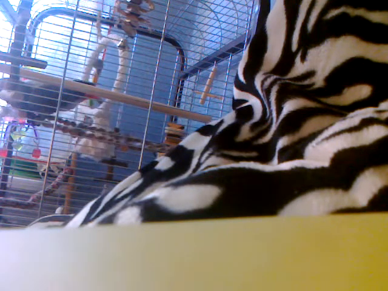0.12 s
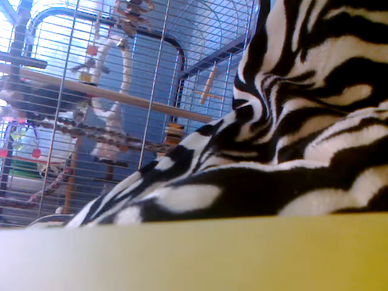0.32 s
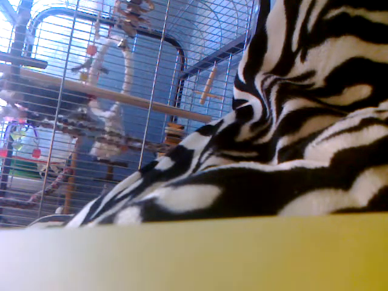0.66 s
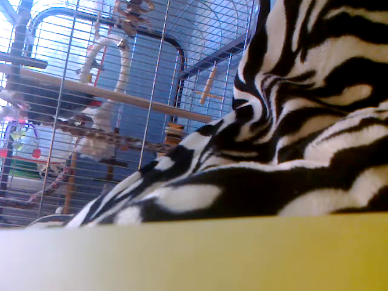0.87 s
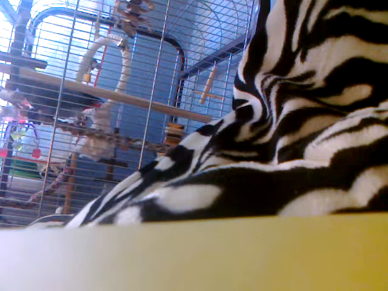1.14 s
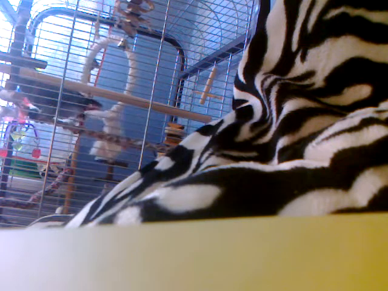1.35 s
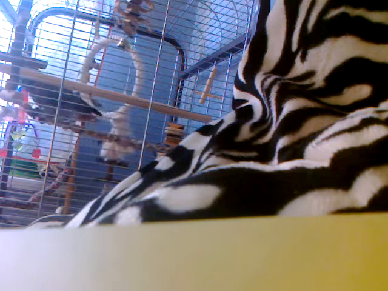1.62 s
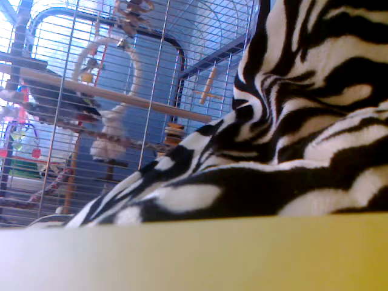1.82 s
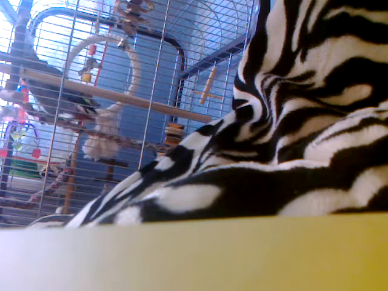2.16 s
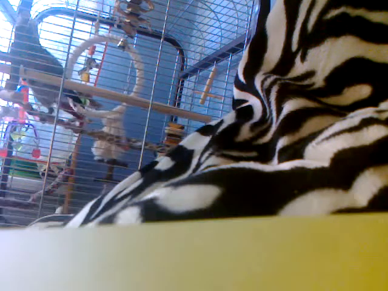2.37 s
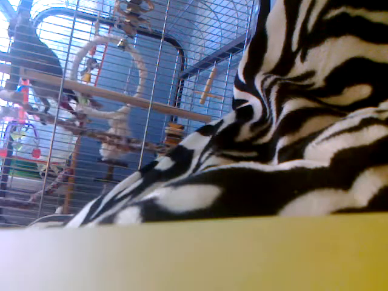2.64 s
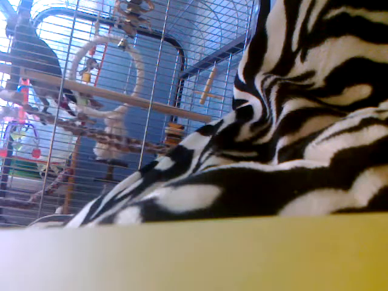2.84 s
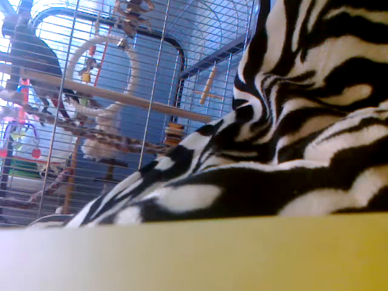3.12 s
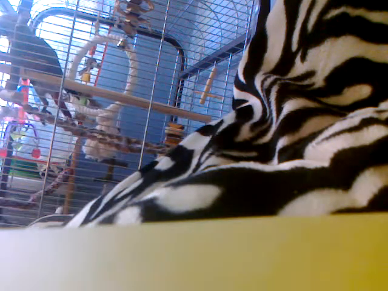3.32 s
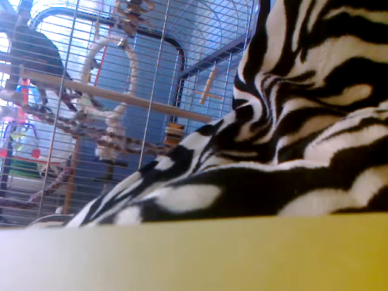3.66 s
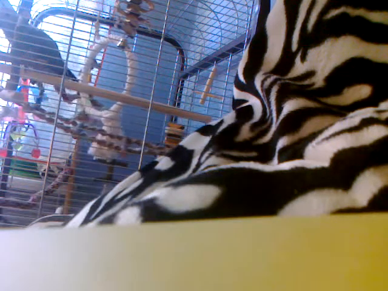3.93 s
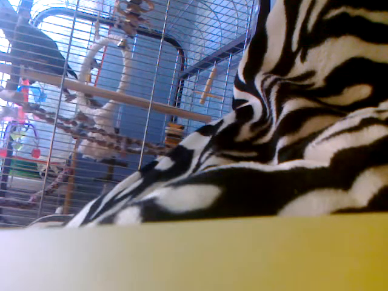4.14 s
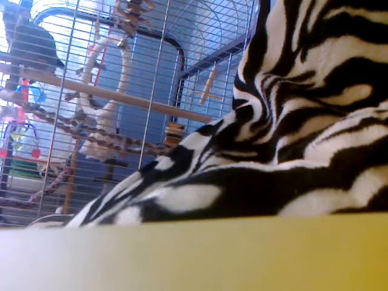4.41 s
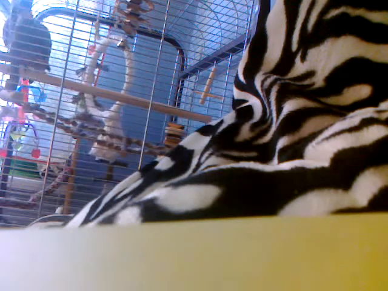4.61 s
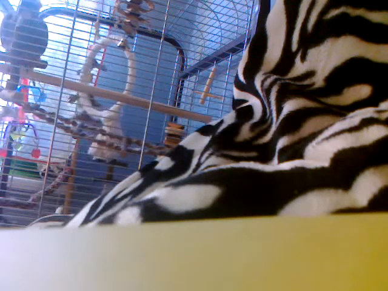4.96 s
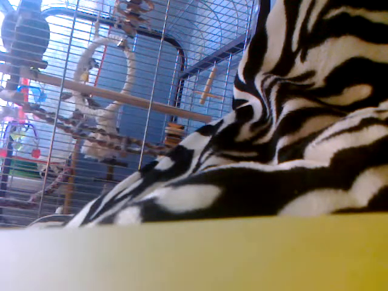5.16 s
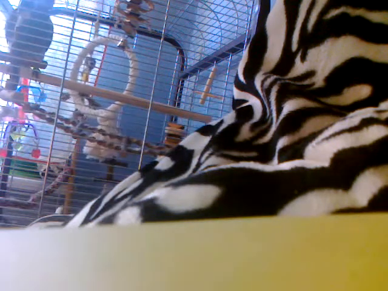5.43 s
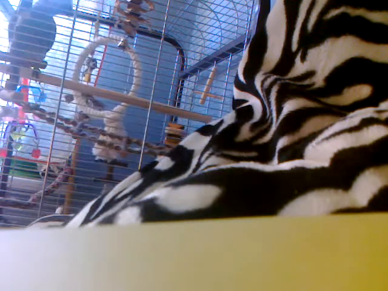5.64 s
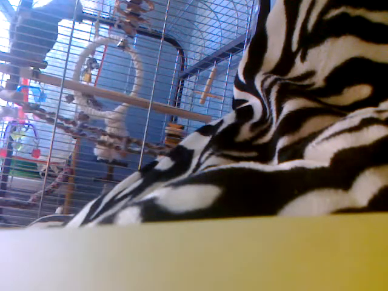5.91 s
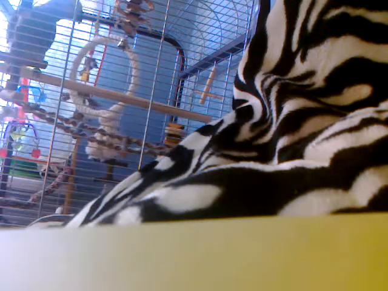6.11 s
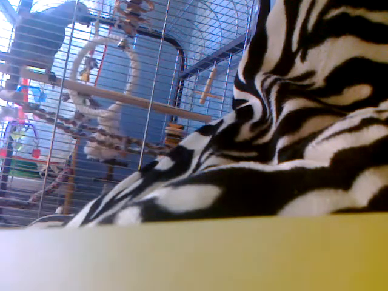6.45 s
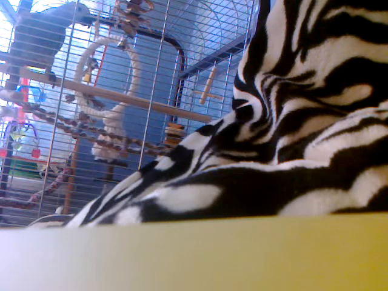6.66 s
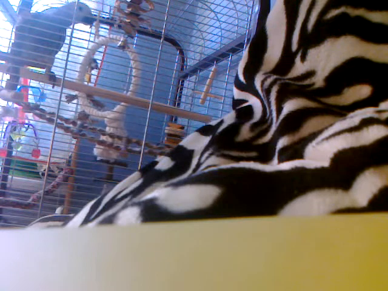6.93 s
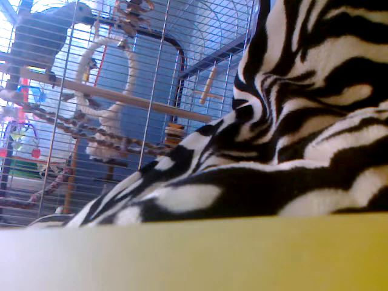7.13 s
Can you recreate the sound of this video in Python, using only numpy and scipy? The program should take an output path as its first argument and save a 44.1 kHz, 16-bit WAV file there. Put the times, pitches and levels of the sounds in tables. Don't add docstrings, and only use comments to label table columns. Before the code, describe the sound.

Faint claw ticks, soft thumps and feather rustles in a humming room, two hollow tongue clucks, then a burst of sharp wooden knocks and quiet ticking.

```python
import sys
import numpy as np
from scipy import signal
from scipy.fft import rfft, irfft, next_fast_len
from scipy.io import wavfile
from scipy.ndimage import map_coordinates

SR = 44100
rng = np.random.default_rng(int(sys.argv[2]) if len(sys.argv) > 2 else 0)


def int16_out(signal):
    q = np.round(np.clip(np.atleast_2d(signal).T, -1, 1) * 32767)
    wavfile.write(sys.argv[1], SR, q.astype(np.int16))


def ratio(d):
    e = np.asarray(d, float) / 20
    return 10 ** e


N = 321003
T = np.arange(N) / SR


def unit(x):
    return x / np.sqrt(np.mean(x ** 2) + 1e-20)


def along(points, hz):
    f, v = np.transpose(points)
    return np.interp(np.log(hz + 1), np.log(f + 1), v)


def wobble(rate):
    knots = rng.standard_normal(int(N * rate / SR) + 4)
    return map_coordinates(knots, [T * rate])


def noise(response):
    m = next_fast_len(N + 8192)
    white = rfft(rng.standard_normal(m))
    return irfft(white * response(np.fft.rfftfreq(m, 1 / SR)), m)[:N]


def colored(curve):
    return unit(noise(lambda f: ratio(along(curve, f))))


def resonances(modes, f):
    total = 0
    for center, width, db in modes:
        once = 1j * f * width / (center * center - f * f + 1j * f * width)
        total = total + ratio(db) * once ** 2
    return total


# f/Hz, t60/s
ROOM_DECAY = [(150, 0.14), (800, 0.41), (2000, 0.34), (5000, 0.31), (12000, 0.53)]


def tail():
    hz, t, z = signal.stft(rng.standard_normal(SR // 2), SR, nperseg=256)
    decay = ratio(-60 * t / along(ROOM_DECAY, hz)[:, None])
    x = signal.istft(z * decay, SR, nperseg=256)[1]
    t = np.arange(len(x)) / SR
    lumps = np.interp(t * 1000, np.arange(600), rng.standard_normal(600))
    x = x * ratio(3.5 * lumps * np.exp(-t / .06))
    x = x * np.clip((t - .0015) / .005, 0, 1)
    return x / np.linalg.norm(x)


def add(out, s, dry, ring, wet_db):
    wet = ratio(wet_db) * signal.fftconvolve(ring, tail())
    wet[:len(dry)] += dry
    out[round(s * SR):][:len(wet)] += wet


# f/Hz, level/dB per Hz
BAR_BUZZ = [(1500, -29), (4000, 5.5), (6500, -0.5), (9000, -4), (15000, -13)]


def contacts(rows, modes, object_db, width_hz, soft_hz, wire_db, wet_db, shade=0.66, flip=1):
    out, f, t = np.zeros(N + SR), np.fft.rfftfreq(2048, 1 / SR), np.arange(2048) / SR
    for (s, db, body_hz, tip_hz, tip_db), room_db in zip(rows, wet_db + np.zeros(len(rows))):
        struck = [(c, w, level + object_db + rng.normal(0, 2.0)) for c, w, level in modes]
        struck += [(body_hz, width_hz, 0), (tip_hz, width_hz, tip_db)]
        dip = 1 - shade * resonances([(3290, 620, 0)], f)
        body = sum(flip ** k * resonances([mode], f) for k, mode in enumerate(sorted(struck)))
        ring = irfft(dip * body / (1 + 1j * f / soft_hz) ** 2)
        blow = ring * t * np.exp(-t / .001)
        buzz = unit(irfft(rfft(rng.standard_normal(2048)) * ratio(along(BAR_BUZZ, f))))
        buzz *= ratio(db + wire_db - 60 * t / 0.076) * (1 - np.exp(-t / 0.0027))
        start = s - np.abs(blow).argmax() / SR
        direct = ratio(db) * blow / np.abs(blow).max() + buzz
        full = ratio(db) * ring / np.abs(ring).max() + buzz
        add(out, start, direct, full, room_db)
    return out[:N]


# t/s, peak level/dB, body f/Hz, tip f/Hz, tip share/dB
ON_PERCH = [
    (5.5502, -15, 2300, 2600, -12),
    (5.5591, -6, 1900, 5000, -17),
    (5.566, -23, 1000, 1500, -3),
]
# f/Hz, width/Hz, level/dB
PERCH_MODES = [(298, 200, -17), (776, 43, -0.5), (1220, 287, 4), (1600, 360, 4), (2360, 140, 3.5),
               (2620, 73, -20), (3840, 290, -13), (5100, 1100, -13), (6500, 1300, -32.5)]


def perch_knocks():
    return contacts(ON_PERCH, PERCH_MODES, object_db=-6.5, width_hz=550, soft_hz=5000,
                    wire_db=-36.5, wet_db=0.4, shade=0.7)


# t/s, peak level/dB, body f/Hz, tip f/Hz, tip share/dB
ON_SWING = [
    (5.7257, -23, 2300, 4500, -15),
    (5.7285, -19, 2000, 3830, 0),
    (5.7447, -19, 2000, 5300, -22),
    (5.75, -15.5, 1170, 2300, -3),
]
# f/Hz, width/Hz, level/dB
SWING_MODES = [(298, 170, -8.5), (533, 450, -15.5), (1318, 296, 3), (1600, 133, 3.5), (2300, 150, -6.5),
               (2820, 140, -2.5), (3780, 200, -15.5), (5400, 700, -13)]


def swing_knocks():
    return contacts(ON_SWING, SWING_MODES, object_db=-6.5, width_hz=550, soft_hz=5000,
                    wire_db=-34.5, wet_db=0.8)


# t/s, peak level/dB, body f/Hz, tip f/Hz, tip share/dB
ON_DOWEL = [
    (5.9127, -28, 2000, 4000, -12),
    (5.9155, -11, 1940, 3800, -13),
    (5.9208, -19, 1500, 1950, 0),
]
# f/Hz, width/Hz, level/dB
DOWEL_MODES = [(258, 190, -14), (435, 310, -18), (770, 210, -12), (1440, 430, -2), (1914, 200, 1.5),
               (2500, 240, -4), (4000, 700, -18.5), (5250, 280, -46.5)]


def dowel_knocks():
    return contacts(ON_DOWEL, DOWEL_MODES, object_db=4.0, width_hz=310, soft_hz=4000,
                    wire_db=-40, wet_db=2.2)


# t/s, peak level/dB, pitch f/Hz, half length/s, overtones/dB
CLUCKS = [
    (2.5595, -24.5, 1597, 0.0016, -3),
    (2.872, -17, 1413, 0.0019, -34),
]
CLUCK_ECHOES = [
    (2.5685, -28, 1650, 0.0028, -12),
    (2.8798, -21, 1600, 0.0011, -45),
    (2.887, -23, 1400, 0.0037, -47),
    (2.8965, -21.5, 1440, 0.0031, -49),
    (2.9165, -22, 1403, 0.003, -42),
]
HARMONICS_DB = [0, -4.5, -7, -19]


def hollow_tones(rows, wet_db):
    out, t = np.zeros(N + SR), np.arange(-900, 900) / SR
    for s, db, hz, half_s, over_db in rows:
        turn = 2 * np.pi * hz * (t + 3 * t * t)
        swell = np.exp(-.5 * (t / half_s) ** 2)
        tone = 0
        for k, level in enumerate(HARMONICS_DB):
            strength = ratio(level + over_db * (k > 0)) * swell ** (1 + 0.54 * k)
            tone = tone + strength * np.sin((k + 1) * turn)
        add(out, s + t[0], ratio(db) * tone, ratio(db) * tone, wet_db)
    return out[:N]


def tongue_clucks():
    first = hollow_tones(CLUCKS[:1], wet_db=1.0)
    second = hollow_tones(CLUCKS[1:], wet_db=-10)
    return first + second + hollow_tones(CLUCK_ECHOES, wet_db=-2.5)


# t/s, peak level/dB, body f/Hz, tip f/Hz, tip share/dB
ON_BARS = [
    (2.557, -31, 3020, 4900, -14),
    (2.8695, -36, 1710, 5180, 0.5),
]
# f/Hz, width/Hz, level/dB
THIN_MODES = [(1702, 1000, 8), (2900, 500, 1.5), (4385, 490, -0.5), (6980, 2600, -14)]


def bar_knocks():
    return contacts(ON_BARS, THIN_MODES, object_db=-10, width_hz=560, soft_hz=5950,
                    wire_db=-18.5, wet_db=4.0)


# t/s, peak level/dB, body f/Hz, tip f/Hz, tip share/dB
ON_ROPE = [
    (5.0197, -41, 2050, 2650, -0.5),
    (5.1308, -35, 1760, 3200, -31),
    (5.1398, -36, 1130, 2200, -21),
    (5.195, -61, 980, 1980, -10),
    (5.2562, -38, 2200, 3500, -5.5),
    (5.2757, -32.5, 1940, 1146, -4.5),
    (5.298, -53.5, 1500, 3000, -6.5),
    (5.395, -31.5, 1260, 2300, -4.5),
    (5.409, -44, 3850, 6300, -10),
    (5.4207, -34, 1980, 2630, -5.5),
]
# f/Hz, width/Hz, level/dB
ROPE_MODES = [(260, 62, 4), (900, 268, -5.5), (1500, 170, 2), (2200, 250, -7), (3000, 600, -10),
              (3850, 400, -17)]


def rope_knocks():
    return contacts(ON_ROPE, ROPE_MODES, object_db=-3.5, width_hz=550, soft_hz=4000,
                    wire_db=-26.5, wet_db=2.0)


# t/s, peak level/dB, body f/Hz, tip f/Hz, tip share/dB
ON_RING = [
    (2.575, -26.5, 1570, 3080, -10),
    (2.581, -24.5, 1310, 2084, 0.5),
    (2.874, -35, 1770, 1100, 9),
]
# t/s, peak level/dB, body f/Hz, room share/dB
ON_TOYS = [(1.739, -36, 1360, 6.5), (1.751, -35.5, 1404, 7), (1.763, -45, 1400, 5), (1.844, -44, 1400, 4.5),
           (1.933, -51.5, 870, 11), (1.944, -50, 1120, 8), (1.97, -45, 1360, 4), (3.617, -54, 1100, -1),
           (3.664, -49, 1010, -6), (3.713, -53, 865, 0), (3.789, -61, 790, -10), (4.205, -45, 1230, 3),
           (4.239, -44, 1080, -12), (4.401, -43, 930, -9)]
# f/Hz, width/Hz, level/dB
TOY_MODES = [(496, 1700, -12), (1003, 52, 5), (1400, 100, 9.5), (2300, 46, 4), (3980, 430, -8.5)]


def toy_knocks():
    ring = contacts(ON_RING, TOY_MODES[1:], object_db=-20, width_hz=550, soft_hz=3000,
                    wire_db=-32.5, wet_db=5.5)
    tip_hz, tip_db = 2050, -7.5
    rows = [(s, db, hz, tip_hz, tip_db) for s, db, hz, _ in ON_TOYS]
    room_db = 3.0 + np.transpose(ON_TOYS)[-1]
    return ring + contacts(rows, TOY_MODES, object_db=-7, width_hz=590, soft_hz=3000,
                           wire_db=-32, wet_db=room_db, flip=-0.89)


# t/s, peak level/dB, stand f/Hz, floor share/dB
THUMPS = [(0.074, -36.5, 142.7, -10), (.134, -43, 133, -23), (.756, -49, 137, -8), (1.287, -37, 142, -5.5),
          (1.338, -50, 130, -18), (1.967, -41, 132, -16), (2.041, -52, 137, -20), (2.617, -44.5, 142, -19),
          (2.78, -36.5, 134.4, -27), (2.849, -38.5, 130, -24), (2.946, -43, 129, -20),
          (3.047, -40.5, 138.4, -12), (4.385, -35, 146, -29), (4.426, -41, 141, -18),
          (5.179, -40.5, 138.5, -17), (5.418, -50, 139, -6), (5.553, -41, 132, -28), (5.744, -57, 133, -22),
          (5.911, -44.5, 138, -7)]
# t/s, peak level/dB
TRAY_KNOCKS = [
    (.075, -60),
    (2.617, -49),
    (2.782, -44.5),
    (5.128, -58),
    (5.417, -42.5),
    (5.554, -49.5),
    (5.744, -51.5),
    (5.912, -42),
]


def thumps():
    stand_t60_s, tray_t60_s, shudder_t60_s = 0.23, .15, 1.6
    tray_hz, tray_share_db, floor_hz, shudder_db = 258.8, -19, 63, -20
    out, shake, t = np.zeros(N + SR), np.zeros(N + SR), np.arange(SR) / SR
    push = 1 - np.exp(-t / 0.0023)
    tray = np.sin(2 * np.pi * tray_hz * t)
    for s, db, hz, floor_db in THUMPS:
        ring = np.sin(2 * np.pi * hz * t) + ratio(tray_share_db) * tray
        ring += ratio(floor_db + 2.0) * np.sin(2 * np.pi * floor_hz * t)
        out[round(s * SR):][:SR] += ratio(db + 2.0 - 60 * t / stand_t60_s) * push * ring
        power = ratio(db + shudder_db - 60 * t / shudder_t60_s) ** 2
        shake[round(s * SR):][:SR] += power * (1 - np.exp(-t / 0.026))
    for s, db in TRAY_KNOCKS:
        out[round(s * SR):][:SR] += ratio(db - 60 * t / tray_t60_s) * push * tray
    return out[:N] + np.sqrt(shake[:N]) * colored(AIR)


# t/s, peak level/dB, body f/Hz
SMALL_TICKS = [(0.057, -53, 1520), (.0897, -58, 2200), (0.1804, -55.5, 2300), (0.215, -52.5, 1900),
               (1.19, -52.5, 2200), (1.2204, -52, 1700), (2.3087, -46.5, 2500), (3.02, -51.5, 1900),
               (3.1128, -58, 1510), (3.305, -51, 2900), (3.469, -59, 2260), (4.1006, -56, 1500),
               (4.298, -49.5, 2630), (4.361, -47, 1600), (3.336, -50, 2900), (6.345, -49.5, 2610)]


def small_ticks():
    tip_hz, tip_db = 2900, -7
    rows = [(s, db, hz, tip_hz, tip_db) for s, db, hz in SMALL_TICKS]
    return contacts(rows, THIN_MODES, object_db=-10.0, width_hz=1180, soft_hz=5000,
                    wire_db=-20.5, wet_db=9.5, shade=0.06, flip=-0.94)


# t/s, peak level/dB
LINK_BLIPS = [
    (2.838, -63),
    (3.017, -63),
]


def link_clicks():
    hz, half_s, over_db = 5000, 0.0014, -45
    return hollow_tones([(s, db, hz, half_s, over_db) for s, db in LINK_BLIPS], wet_db=-6)


def squeak():
    peak_s, peak_db, rise_db_per_s, fall_db_per_s = 4.904, -64.5, 400, 261
    fade_db = np.where(T < peak_s, rise_db_per_s, fall_db_per_s) * np.abs(T - peak_s)
    return ratio(peak_db - fade_db) * unit(noise(lambda f: resonances([(4370, 300, 0)], f)))


# middle t/s, level/dB rms, half length/s
RUSTLES = [
    (.06, -60, .12),
    (0.458, -68.5, 0.12),
    (1.11, -66.5, .06),
    (1.892, -61, 0.093),
    (2.734, -61, 0.15),
    (3.01, -62, 0.11),
    (3.444, -67, 0.11),
    (3.695, -67.5, 0.15),
    (4.291, -60, 0.091),
    (5.29, -61, 0.03),
]
# f/Hz, level/dB per Hz
FEATHERS = [(150, -35), (400, 0.5), (1000, 2), (2000, -10), (4000, -17.5), (7000, -26), (12000, -60)]


def rustles():
    swells = sum(ratio(db) * np.exp(-.5 * ((T - s) / half_s) ** 2) for s, db, half_s in RUSTLES)
    return swells * ratio(2.8 * wobble(40)) * colored(FEATHERS)


# delay t/s, peak level/dB, body f/Hz
CLOCK_STEP = [
    (0, -55, 2410),
    (.012, -55, 2400),
    (.034, -48, 1800),
    (.042, -48, 1530),
]


def clock():
    first_s, tip_hz, tip_db = .299, 2900, 1
    scatter_s, scatter_db = .002, .5
    steps = [(first_s + k + delay, db, hz) for k in range(N // SR) for delay, db, hz in CLOCK_STEP]
    late, loud = rng.standard_normal((len(steps), 2)).T
    rows = [(s + scatter_s * a, db + scatter_db * b, hz, tip_hz, tip_db)
            for (s, db, hz), a, b in zip(steps, late, loud)]
    return contacts(rows, THIN_MODES, object_db=-5.0, width_hz=1300, soft_hz=5020,
                    wire_db=-22.5, wet_db=8, shade=0.07, flip=-0.79)


HUM_HZ = [120.49, 128.6, 471.5]
HUM_DB = [-49.5, -65.5, -67]
# f/Hz, width/Hz, level/dB rms
AIR_MODES = [(62, 18, -68), (148.3, 9.7, -61), (170, 30, -69.5), (250, 30, -75.5), (287.6, 18, -72.5),
             (352.4, 57, -74.5), (430, 17, -72), (763.5, 25, -75.5)]
# f/Hz, level/dB per Hz
AIR = [(60, -33.5), (105, -4.5), (135, 0.5), (200, -8), (330, -17), (900, -15.5), (2080, -27), (6000, -73)]
# f/Hz, level/dB per Hz
RUMBLE = [(12, -28.5), (22, 3.5), (45, -6.5), (85, -9), (110, -16.5), (200, -42.5), (400, -120)]


def hum():
    out = np.zeros(N)
    for hz, db in zip(HUM_HZ, HUM_DB):
        out += np.sqrt(2) * ratio(db + .4 * wobble(1.3)) * np.sin(2 * np.pi * hz * T)
    for hz, width, db in AIR_MODES:
        mode = unit(noise(lambda f: resonances([(hz, width, 0)], f)))
        out += ratio(db + 0.4 * wobble(3.83)) * mode
    out += ratio(-59 + 2.0 * wobble(14)) * colored(AIR)
    return out + ratio(-63.5 + 1.3 * wobble(3)) * colored(RUMBLE)


def scene():
    bird = perch_knocks() + swing_knocks() + dowel_knocks()
    bird += tongue_clucks() + bar_knocks()
    bird += rope_knocks() + toy_knocks() + thumps()
    bird += small_ticks() + link_clicks() + squeak() + rustles()
    return (bird + clock() + hum())[None]


def roll_off(x):
    return signal.sosfilt(signal.butter(12, 15940, fs=SR, output="sos"), x)


# f/Hz, level/dB per Hz
HISS = [(880, -39), (1500, -16.5), (1810, -9.5), (2140, -25.5), (2740, -5), (3080, -4.5), (9940, -4),
        (15800, -9)]
# f/Hz, level/dB rms
COMB = [(4000, -108), (7000, -95), (10000, -105.5), (13500, -91.5), (14600, -104), (15300, -96.5),
        (15650, -83)]


def record(dry):
    comb_hz, top_hz, offset = 256.002, 15850, 0.00038
    hiss = ratio(-70 + 0.4) * colored(HISS)
    hz = comb_hz * np.arange(14, 62)
    size, turn = rng.standard_normal((len(hz), 2)).T
    heard = rfft(dry + hiss)
    lines = ratio(along(COMB, hz) + 2.0 + 3 * size) * np.exp(9j * turn)
    heard[:, np.round(hz * N / SR).astype(int)] += N / 2 * lines
    heard = irfft(heard * (np.fft.rfftfreq(N, 1 / SR) < top_hz), N)
    return roll_off(heard + offset)


dry = scene()
out = record(dry)
int16_out(out)
```